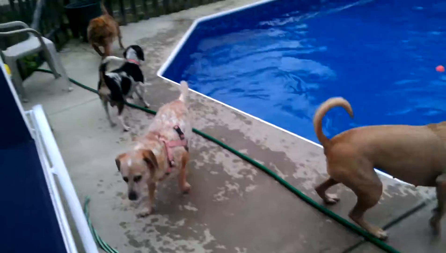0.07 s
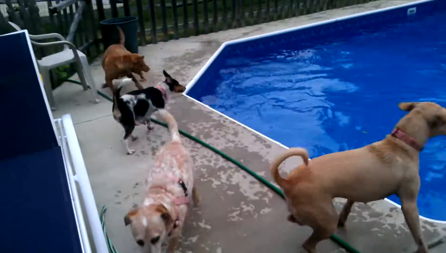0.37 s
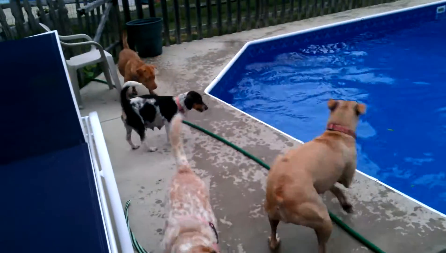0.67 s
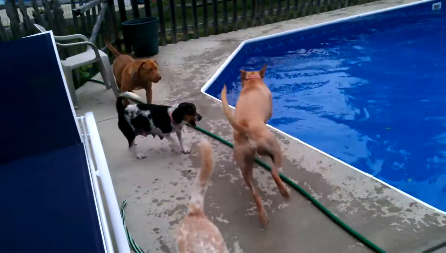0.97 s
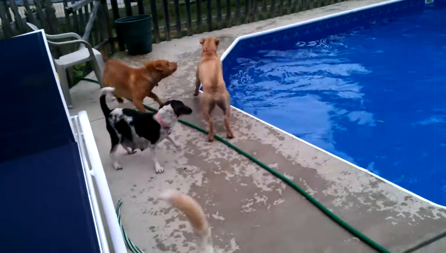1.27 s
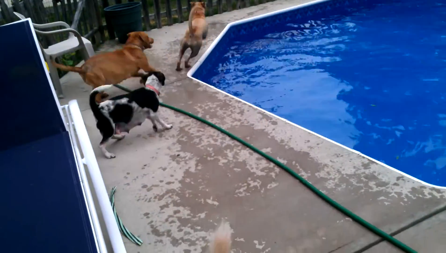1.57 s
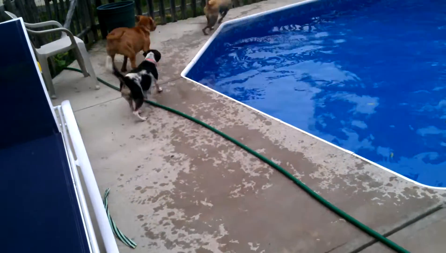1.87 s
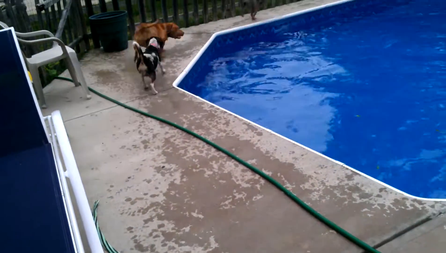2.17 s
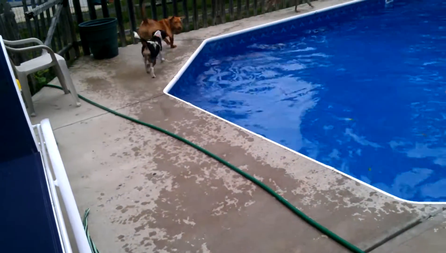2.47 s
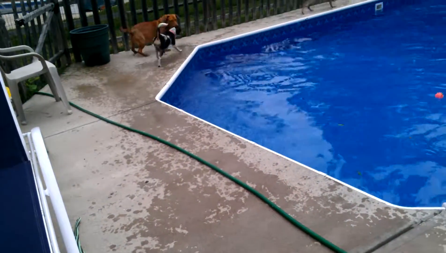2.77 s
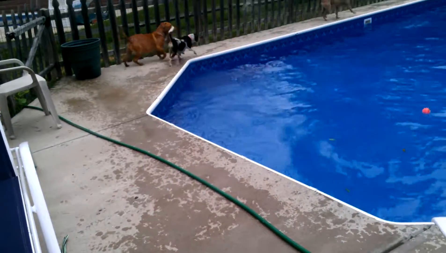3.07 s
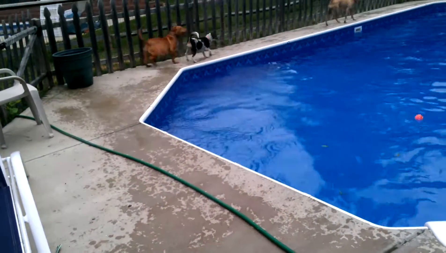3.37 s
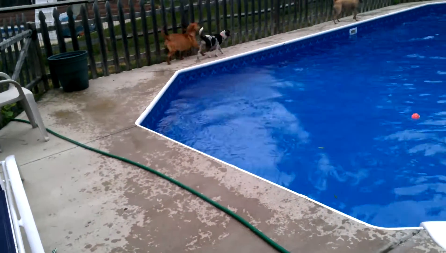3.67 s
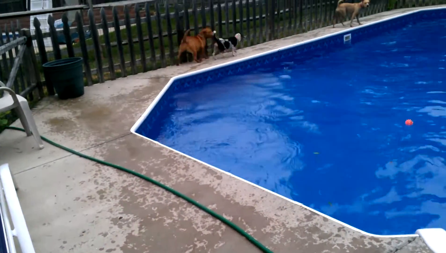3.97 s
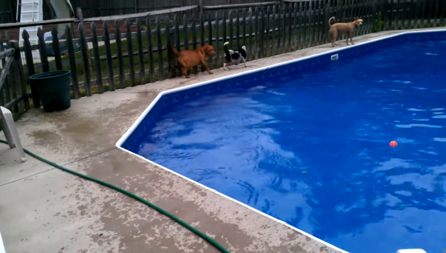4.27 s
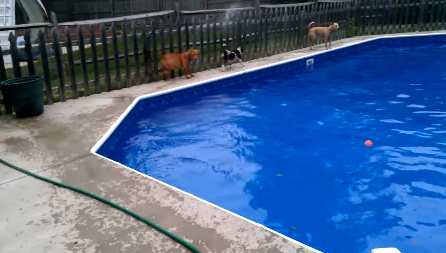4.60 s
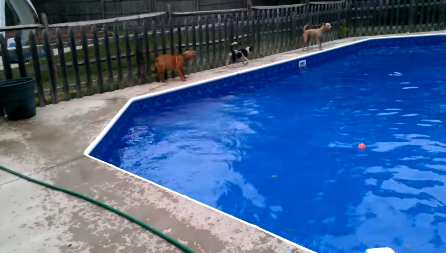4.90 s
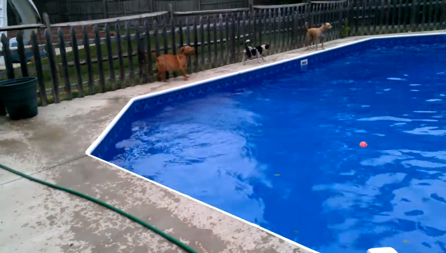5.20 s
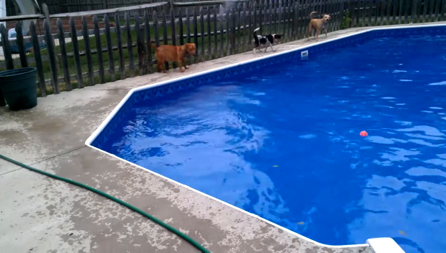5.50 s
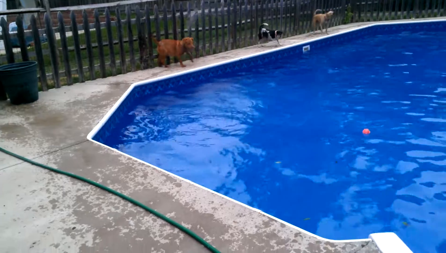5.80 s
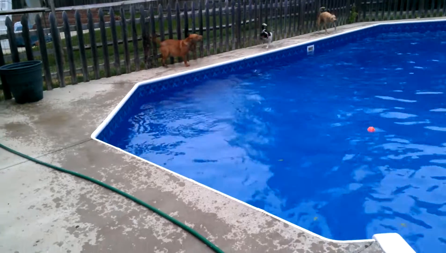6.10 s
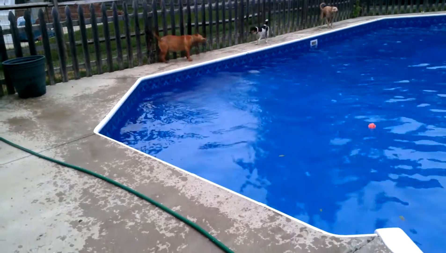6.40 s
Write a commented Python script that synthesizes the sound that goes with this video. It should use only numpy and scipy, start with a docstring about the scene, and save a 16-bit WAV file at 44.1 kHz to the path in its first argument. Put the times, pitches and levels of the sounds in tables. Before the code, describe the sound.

Dogs trot over concrete outdoors, their claws making sharp, irregular clicks and their collar tags clinking lightly. After about a second one gives a soft, low woof and a few short, hoarse grunts. Close by, a sleeve rustles and swishes against the hand-held microphone, and the grip creaks loudly at the start and again halfway through. A pool pump hums faintly underneath.

```python
"""Dogs on a pool deck.

Dogs trot off over concrete: claws click by impact and collar tags ring in their natural modes.
One gives a low woof and a few short grunts, pulsed airflow shaped by chest, throat and mouth.
Close by, friction makes a sleeve rustle and swish against a hand-held camera, and the grip twice
creaks by stick-slip on its hollow case. A pool pump hums under the faint outdoor air."""
import sys
import numpy as np
from scipy import signal
from scipy.fft import rfft, irfft, next_fast_len
from scipy.io import wavfile
from scipy.ndimage import uniform_filter1d, map_coordinates

SR = 44100
rng = np.random.default_rng(int(sys.argv[2]) if len(sys.argv) > 2 else 0)


def transcribe(u):
    """Save the signal u as a 16-bit wav file named by the first command-line argument.

    u: samples, shape (n,) or (channels, n), limited to [-1, 1]; the rate is SR.
    q: integer samples, one column per channel.
    """
    v = np.clip(np.atleast_2d(u).T, -1, 1)
    q = np.round(v * 32767).astype(np.int16)
    wavfile.write(sys.argv[1], SR, q)


N = 284445


def amp(db):
    """Decibels to amplitude ratio."""
    return 10 ** (np.asarray(db) / 20)


def unit(x):
    """Normalisation to rms 1."""
    return x / np.sqrt(np.mean(x ** 2) + 1e-20)


def along(points, hz):
    """Interpolation of (frequency_hz, value) points on a log frequency axis."""
    frequencies, values = np.transpose(points)
    return np.interp(np.log(hz + 1), np.log(frequencies + 1), values)


def curves(rows):
    """Linear interpolation in time: one curve for each column after the first."""
    times, *columns = np.transpose(rows)
    return [np.interp(np.arange(N) / SR, times, column) for column in columns]


def wobble(rate_hz):
    """Smooth random modulation: a spline through Gaussian knots."""
    knots = rng.standard_normal(int(N * rate_hz / SR) + 4)
    return map_coordinates(knots, [np.arange(N) * rate_hz / SR])


def filtered(x, response):
    """Linear filtering: the spectrum times a frequency response."""
    n = x.shape[-1]
    size = next_fast_len(n + 8192)
    return irfft(rfft(x, size) * response(np.fft.rfftfreq(size, 1 / SR)), size)[..., :n]


def coloured(x, spectrum):
    """Spectral shaping by (frequency_hz, gain_db) points, at rms 1."""
    return unit(filtered(x, lambda hz: amp(along(spectrum, hz))))


def pan(db):
    """Level difference, left over right, as two gains of mean 1."""
    gains = np.array([amp(np.atleast_1d(db) / 2), amp(-np.atleast_1d(db) / 2)])
    return gains / gains.mean(0)


def add(track, start_s, x):
    """Superposition of x on the track."""
    i = max(round(start_s * SR), 0)
    track[..., i:i + x.shape[-1]] += x[..., :N - i]


def swell(t, length_s, rise=0.33):
    """Critically damped pulse: it peaks at 1 after the share rise of its length."""
    u = t / (length_s * rise)
    return u * np.exp(1 - u)


def ring(modes, t, attack_s, vary_db):
    """Modal vibration: one blow excites damped sines of slightly random strength and pitch; peak 1."""
    x = sum(amp(db + vary_db * rng.normal() - 60 * t / t60)
            * np.sin(2 * np.pi * hz * rng.normal(1, 0.0057) * t) for hz, t60, db in modes)
    x *= 1 - np.exp(-t / attack_s)
    return x / np.abs(x).max()


# Likeness of left and right: frequency_hz, correlation
COHERENCE = [(100, 0.97), (600, 0.71), (1200, 0.057), (4000, 0.042), (12000, 0.046)]
def stereo_noise(patchy_db=0):
    """Partial coherence: noise alike on both sides in the bass only, with patches of random gain."""
    def mid_side(hz):
        angle = np.arccos(along(COHERENCE, hz)) / 2
        return np.array([np.cos(angle), np.sin(angle)])
    spectra = signal.stft(rng.standard_normal((2, N)), nperseg=512)[2]
    patches = uniform_filter1d(rng.standard_normal(spectra.shape[1:]), size=3, axis=0)
    patches = unit(uniform_filter1d(patches, size=7, axis=1))
    noise = signal.istft(spectra * amp(patchy_db * patches), nperseg=512)[1][:, :N]
    mid, side = filtered(noise, mid_side)
    return np.array([mid + side, mid - side])


# Shadow of the case: frequency_hz, left_over_right_db
CASE_SHADOW = [(1000, 3), (4000, 2.5), (5500, -19), (8000, -7), (12000, -16.5)]
def from_right(x):
    """Acoustic shadowing: the case shields its left port from the treble."""
    return filtered(x, lambda hz: pan(along(CASE_SHADOW, hz)))


# Outdoor air: frequency_hz, gain_db
AIR_SPECTRUM = [(100, -1), (240, -4), (330, -13.5), (500, -19.5), (820, -13.5), (1260, -25), (2500, -23),
                (4300, -19.5), (5200, -42), (6200, -48), (8200, -39.5), (14000, -59)]
def outdoor_air():
    """Ambient noise: a faint broad spectrum above 50 Hz."""
    air = coloured(stereo_noise(patchy_db=4), AIR_SPECTRUM)
    return amp(-56) * filtered(air, lambda hz: hz > 50)


# Tones of the pump: frequency_hz, level_db
PUMP_TONES = [(112.5, -63), (118.4, -70), (236.9, -63.5), (355.3, -67.5)]
def pool_pump():
    """Amplitude and phase modulation make the pump's hum slightly unsteady."""
    t = np.arange(N) / SR
    return sum(np.sqrt(2) * amp(db + 3.6 * wobble(6)) * np.sin(2 * np.pi * hz * t + 0.82 * wobble(3.98))
               for hz, db in PUMP_TONES)


# Rubbing of the resting sleeve: time_s, level_db
RESTING_CONTACT = [(0.1, -56.5), (0.5, -52.5), (0.6, -71.5), (0.83, -69), (0.9, -53.5), (1.44, -54),
                   (2.0, -52), (2.35, -48), (2.62, -62), (3.3, -62.5), (3.56, -69), (3.98, -55), (4.3, -64),
                   (4.83, -69), (5.1, -64), (5.58, -59.5), (5.78, -70.5), (6.45, -71)]
# Strokes of the arm: start_s, hold_s, hiss_db, rasp_db
ARM_STROKES = [(0.252, 0.085, -40.5, -47), (0.364, 0.028, -33.5, -38), (0.715, 0.051, -56, -57),
               (0.874, 0.019, -49.5, -61), (0.94, 0.032, -60, -48.5), (1.185, 0.17, -46.5, -46),
               (1.498, 0.035, -43, -46.5), (1.654, .03, -49, -55), (1.795, .13, -50.5, -50.5),
               (2.525, 0.037, -47, -67), (2.683, 0.18, -51, -51), (2.985, 0.14, -47, -54),
               (3.107, 0.076, -44.5, -51), (3.275, 0.017, -48, -52.5), (3.474, .02, -62.5, -57),
               (3.664, .1, -62, -55.5), (4.045, 0.16, -50.5, -54.5), (4.39, 0.13, -57.5, -52.5),
               (4.992, .08, -51.5, -56.5), (5.276, 0.14, -57, -54.5), (5.886, 0.1, -56.5, -51.5),
               (6.012, 0.069, -49, -46.5), (6.236, 0.019, -59, -57.5), (6.329, 0.097, -50, -51.5)]
def arm_levels(rise_db_per_s=547, fall_db_per_s=188):
    """Incoherent addition: strokes and resting contact sum in power, giving hiss and rasp in dB."""
    t = np.arange(N) / SR
    contact_db, = curves(RESTING_CONTACT)
    hiss, rasp = amp(contact_db) ** 2, amp(contact_db - 4) ** 2
    for start_s, hold_s, hiss_db, rasp_db in ARM_STROKES:
        shape_db = -rise_db_per_s * np.maximum(start_s - t, 0)
        shape_db -= fall_db_per_s * np.maximum(t - start_s - hold_s, 0)
        active = shape_db > -60
        hiss[active] += amp(hiss_db + shape_db[active]) ** 2
        rasp[active] += amp(rasp_db + shape_db[active]) ** 2
    return 10 * np.log10(hiss), 10 * np.log10(rasp)


# Bumps of the hand: start_s, level_db
HAND_BUMPS = [(0.26, -41), (1.328, -36.5), (2.331, -45), (2.698, -44), (3.121, -37.5), (3.649, -44.5),
              (4.038, -40), (4.101, -41), (4.39, -42), (4.463, -38.5), (4.744, -41.5), (4.911, -43.5),
              (5.166, -41), (5.37, -41.5), (5.539, -46.5), (5.661, -48.5), (5.915, -38.5), (5.985, -38.5),
              (6.088, -44), (6.36, -44)]
# Shaking of the case: frequency_hz, gain_db
RUMBLE_SPECTRUM = [(20, -29), (36, -16), (56, 6), (80, -1.5), (110, 1), (155, -9), (220, -9.5), (320, -13),
                   (450, -21.5), (800, -18.5), (1300, -23.5), (3000, -32.5)]
def hand_rumble(rubbing_db, bump_hz=110, lowest_hz=45):
    """Structure-borne sound: rubbing shakes the case; a bump swells the shaking and rings it low."""
    lumps, tones, t = np.zeros(N), np.zeros(N), np.arange(SR // 4) / SR
    for start_s, db in HAND_BUMPS:
        push = amp(db) * swell(t, length_s=0.058, rise=0.36)
        add(lumps, start_s, amp(-5) * push)
        add(tones, start_s, amp(-4) * push * np.sin(2 * np.pi * bump_hz * rng.normal(1, 0.053) * t))
    shake_db = -51 + 0.25 * (rubbing_db - rubbing_db.mean())
    noise = coloured(stereo_noise() * amp(4.6 * wobble(25)), RUMBLE_SPECTRUM)
    out = tones + np.hypot(amp(shake_db), lumps) * noise
    return filtered(out, lambda hz: 1 / (1 + (lowest_hz / (hz + 1)) ** 8)) * pan(-1.6)


# Bright hiss of cloth: frequency_hz, gain_db
HISS_SPECTRUM = [(500, -9.5), (1200, -18.5), (2200, -10.5), (3100, -9.5), (3900, -13), (4900, -8.5),
                 (6000, 1), (8200, 0.5), (10500, -1), (12000, -8.5), (14000, -7)]
# Lower rasp of cloth: frequency_hz, gain_db
RASP_SPECTRUM = [(600, -18), (1500, -26), (2200, -17.5), (3000, -8.5), (3700, -4.5), (4400, 2.5),
                 (5000, -8), (7000, -53), (12000, -30)]
def sleeve_rustle(hiss_db, rasp_db, snags_per_s=28, snag_decay_s=0.00096, snag_db=9):
    """Friction noise: fibres catch and slip in tiny grains, some snagging harder."""
    catches = rng.random(N) < snags_per_s / SR
    snags = signal.lfilter([1], [1, -np.exp(-1 / (snag_decay_s * SR))], catches)
    grain = amp(0.6 * wobble(900) + 1.15 * wobble(70) + snag_db * np.minimum(snags, 1))
    hiss = from_right(coloured(stereo_noise(patchy_db=4) * grain, HISS_SPECTRUM))
    rasp = coloured(stereo_noise(patchy_db=5) * grain, RASP_SPECTRUM) * pan(2.4)
    return amp(hiss_db + 5) * hiss + amp(rasp_db + 3) * rasp


# Slides of ribbed cloth: start_s, length_s, start_hz, end_hz, spread_hz, level_db
RIB_SLIDES = [(0.351, 0.042, 5750, 5470, 1860, -32.5), (1.111, 0.062, 6260, 5590, 497, -42),
              (1.49, .095, 4740, 4470, 1230, -38), (1.771, 0.12, 4560, 3840, 550, -44.5),
              (2.74, 0.054, 5860, 5600, 300, -44.5), (2.855, 0.057, 5580, 5300, 250, -49),
              (3.699, 0.056, 4680, 4350, 300, -43.5), (3.91, 0.02, 6200, 5700, 250, -46.5),
              (4.035, 0.091, 5270, 5700, 302, -42.5), (4.141, 0.031, 6800, 5760, 550, -35),
              (4.378, 0.027, 6270, 5900, 330, -38.5), (4.393, 0.095, 4780, 4010, 463, -45.5),
              (4.679, 0.029, 6030, 6140, 238, -41), (4.868, 0.082, 4470, 3400, 200, -60.5),
              (4.987, 0.044, 6550, 6330, 416, -41.5), (5.063, 0.098, 4190, 3610, 396, -45.5),
              (5.199, 0.063, 5600, 5600, 175, -54.5), (5.285, 0.046, 5930, 5500, 380, -37.5),
              (5.316, 0.12, 4320, 3970, 470, -42.5), (5.973, 0.094, 4590, 3950, 510, -38.5)]
def sleeve_swishes(flutter_db=2):
    """Periodic friction: ribs skip over ribs in a fuzzy whistle that sinks when the slide slows."""
    out, t = np.zeros((2, N)), np.arange(SR // 4) / SR
    for start_s, length_s, start_hz, end_hz, spread_hz, db in RIB_SLIDES:
        hz = start_hz * (end_hz / start_hz) ** np.minimum(t / length_s, 1)
        fuzz = rng.standard_normal((2, len(t), 2)) @ [1, 1j]
        fuzz = signal.sosfilt(signal.butter(3, spread_hz, fs=SR, output="sos"), fuzz)
        whistle = unit((fuzz * np.exp(2j * np.pi * np.cumsum(hz) / SR)).real)
        add(out, start_s, amp(db) * whistle * swell(t, length_s))
    return from_right(out * unit(amp(flutter_db * wobble(200))))


# Ticks of the case: start_s, peak_db
CASE_TICKS = [(0.4253, -39), (0.553, -36.5), (3.1915, -25), (3.2228, -17.5)]
# Modes of a tick: frequency_hz, t60_s, level_db
DEAD_MODES = [(750, .009, -2), (1400, 0.0083, 3), (2150, .01, 7), (3000, 0.0073, -20)]
def case_ticks():
    """Heavy damping: the stiff case gives way with a dead, broad tick."""
    out, t = np.zeros(N), np.arange(SR // 20) / SR
    for start_s, db in CASE_TICKS:
        add(out, start_s, amp(db) * ring(DEAD_MODES, t, attack_s=0.0001, vary_db=1))
    return out


# Creaks of the grip: start_s, length_s, level_db, thud_db, snap_db
GRIP_CREAKS = [(0.245, .155, -29.5, -6.5, -24), (3.107, .1, -28.5, -4, 2.5)]
def slips(gap_s=0.012, scatter=0.33, vary_db=1.7):
    """Stick-slip motion: each creak is an uneven run of slips, listed like the jolts below."""
    rows = []
    for start_s, length_s, db, thud_db, snap_db in GRIP_CREAKS:
        for k, (offset, strength) in enumerate(rng.standard_normal((40, 2))):
            if k * gap_s < length_s:
                slip_s = start_s + gap_s * (k + scatter * offset)
                rows.append((slip_s, db + vary_db * strength, thud_db, snap_db))
    return rows


# Jolts, where the grip gives way at once: start_s, level_db, thud_db, snap_db
GRIP_JOLTS = [(0.27, -31.5, 6, -18), (0.3236, -13.5, -11.5, -37), (3.1175, -19, -20, -6),
              (3.161, -24.5, -25, -5)]
# Modes of the hollow case, its low thud and its wall: frequency_hz, t60_s, level_db
CASE_MODES = [(580, 0.035, -19), (638, 0.056, -4), (725, 0.068, -4.5), (810.4, 0.091, 1.5), (867, 0.043, 2),
              (940, 0.042, -7)]
THUD_MODES = [(109, 0.039, -25), (246, 0.092, -2), (309, 0.048, 3.5), (358, 0.022, 12.5), (450, 0.015, 0)]
WALL_MODES = [(1300, .015, -4), (1510, .02, -6), (1760, 0.018, -1), (2140, 0.031, 14.5), (2360, 0.024, 8),
              (2590, 0.099, 1.5)]
# Friction on the wall: frequency_hz, gain_db
GRATE_SPECTRUM = [(1000, -30), (1500, -4), (1950, 10), (2700, 1), (3000, -35), (5000, -42)]
def grip_creaks(damped_above_hz=1020, grate_t60_s=0.047, chatter_t60_s=0.1):
    """Impulse excitation: each slip of the hand knocks the case, grates and chatters on briefly."""
    out, t = np.zeros(N), np.arange(SR // 6) / SR
    damping = signal.butter(6, damped_above_hz, fs=SR, output="sos")
    for start_s, db, thud_db, snap_db in GRIP_JOLTS + slips():
        case, thud, snap = (ring(modes, t, attack_s=0.0015, vary_db=2)
                            for modes in (CASE_MODES, THUD_MODES, WALL_MODES))
        knock = signal.sosfilt(damping, case) + amp(thud_db - 3) * thud + amp(snap_db - 2) * snap
        chatter = 0.014 * rng.standard_normal(len(t)) * amp(-60 * t / chatter_t60_s)
        grate = coloured(rng.standard_normal(len(t)), GRATE_SPECTRUM)
        grate *= amp(snap_db - 6 - 60 * t / grate_t60_s)
        add(out, start_s, amp(db) * (knock + grate + signal.fftconvolve(knock, chatter)[:len(t)]))
    return out


def right_first(x, lag_s=0.00026):
    """Arrival-time difference: sound from the right reaches the left port later."""
    return filtered(x, lambda hz: np.exp(1j * np.pi * hz * lag_s * np.array([[-1], [1]])))


# Decay of the yard: frequency_hz, t60_s
YARD_DECAY = [(200, 0.04), (1000, 0.25), (10000, 0.14)]
def yard_reverb(x):
    """Reverberation: fence and house wall answer briefly, the midrange lasting longest."""
    hz, t, spectra = signal.stft(rng.standard_normal((2, SR // 3)), SR, nperseg=256)
    decay = amp(-60 * t / along(YARD_DECAY, hz)[:, None])
    tail = signal.istft(spectra * decay, SR, nperseg=256)[1]
    return signal.fftconvolve(x[None], tail / np.linalg.norm(tail[0]), axes=1)[:, :N]


# Tags touching: start_s, level_db
TAG_STRIKES = [(0.627, -46), (0.689, -44.5), (0.73, -38.5), (0.766, -41), (0.778, -37.5), (1.129, -36),
               (1.291, -34), (1.557, -28), (3.886, -37.5), (3.913, -40), (3.948, -36), (4.016, -36.5),
               (4.043, -42), (5.125, -43), (5.397, -36)]
# Modes of a tag: frequency_hz, t60_s, level_db
TAG_MODES = [(4550, .07, -11), (5570, 0.11, -5.5), (5830, 0.043, 4), (8120, 0.13, 6.5), (8100, .05, -4),
             (10260, 0.072, 4), (13000, .04, -13)]
def collar_tags(flutter_db=2.9):
    """Free vibration of plates: metal tags collide and ring in inharmonic modes."""
    out, t = np.zeros((2, N)), np.arange(SR // 6) / SR
    for start_s, db in TAG_STRIKES:
        clink = np.array([ring(TAG_MODES, t, attack_s=0.00084, vary_db=7) for side in range(2)])
        add(out, start_s, amp(db) * clink)
    return from_right(out * unit(amp(flutter_db * wobble(300))))


# Claws on concrete: start_s, level_db, body_db, body_left_over_right_db, t60_s
CLAW_STRIKES = [(0.133, -30, 0.5, 3.5, 0.039), (0.233, -21.5, -25, 11, 0.045),
                (0.4347, -27.5, -7, 27, 0.096), (0.852, -27.5, -21, -3, 0.08),
                (0.8834, -28, -10.5, 1, 0.038), (0.9367, -30.5, 3, -3.5, 0.19),
                (1.0388, -24, -0.5, -2.5, 0.052), (1.331, -20, -7.5, 3, .05), (1.493, -24, -22, 9, 0.022),
                (1.6804, -29.5, -20, -5, .051), (2.2118, -19.5, -9.5, -2.5, 0.043),
                (2.39, -25, -5.5, 6, .077), (2.408, -21, -13, 15, 0.037), (2.8596, -35.5, -7, -3, .085),
                (2.9624, -29.5, -8, 7, .063), (3.091, -22.5, -3.5, 0, 0.041), (3.116, -22, 0, 9, 0.029),
                (3.267, -32, -1.5, 2, 0.086), (4.1454, -29.5, -11, 0, .049),
                (4.189, -31.5, -14.5, -2, 0.086), (4.4889, -24, -3, 1, 0.053), (5.623, -32.5, -1, 0, 0.13),
                (5.9055, -38.5, -7, 5, .065), (6.34, -31.5, -2.5, 4, 0.12), (6.373, -30.5, -14, 7, 0.068),
                (6.409, -32.5, -3.5, 5, 0.045)]
# Bright edge and duller body of a click: frequency_hz, gain_db
EDGE_SPECTRUM = [(2000, -22), (4500, 2), (6200, 10), (8200, 8.5), (10500, -1), (14000, -3.5)]
BODY_SPECTRUM = [(200, -10.5), (800, -5), (1300, -7.5), (1800, -1.5), (2300, 1), (3100, -4), (4100, 3.5),
                 (5200, -7), (9000, -50)]
def claw_clicks(attack_s=0.0025, strike_s=0.002, rebound_s=0.0055, spike_t60_s=0.0067, tail_t60_s=0.55):
    """Impact and rebound: a claw strikes and bounces once within a gritty scrape with a weak tail."""
    edge, body, t = np.zeros(N), np.zeros((2, N)), np.arange(SR // 3) / SR
    spike = amp(0.5 - 60 * t / spike_t60_s) * (1 - np.exp(-t / 0.00043))
    tail = amp(-20 - 60 * t / tail_t60_s)
    for start_s, db, body_db, side_db, t60_s in CLAW_STRIKES:
        scrape = (1 - np.exp(-t / attack_s)) * (amp(-60 * t / t60_s) + tail)
        edge_gain = amp(db - 4.5)
        add(edge, start_s, edge_gain * scrape)
        add(edge, start_s + strike_s, edge_gain * spike)
        add(edge, start_s + strike_s + rebound_s * rng.uniform(0.41, 1), edge_gain * spike / 2)
        add(body, start_s, amp(db + body_db - 5) * scrape * pan(side_db))
    grit = amp(2 * wobble(900))
    edge_noise = from_right(coloured(stereo_noise(patchy_db=0.5) * grit, EDGE_SPECTRUM))
    body_noise = coloured(stereo_noise(patchy_db=1.5) * grit, BODY_SPECTRUM)
    return edge * edge_noise + body * body_noise


def vocal_folds(pitch_hz, jitter, breath_share):
    """Glottal source: uneven pulses mixed with air that escapes once a cycle."""
    cycles = np.cumsum(pitch_hz * np.exp(jitter * wobble(120))) / SR
    pulses = unit(np.diff(np.floor(cycles), prepend=0) * amp(1.7 * wobble(150)))
    breath = unit(rng.standard_normal(N) * np.exp(-3 * (cycles % 1)))
    return np.sqrt(1 - breath_share) * pulses + np.sqrt(breath_share) * breath


# Grunts: start_s, length_s, pitch_hz, mouth_hz, level_db
DOG_GRUNTS = [(1.433, 0.022, 143.5, 696, -48.5), (1.663, 0.022, 155.3, 930, -36),
              (1.679, 0.022, 141, 920, -46), (1.685, 0.025, 156, 766, -38.5),
              (1.759, 0.022, 171.6, 1080, -36.5), (1.778, 0.039, 157, 1000, -39),
              (1.84, 0.018, 151, 930, -41.5), (2.129, 0.011, 156, 930, -49)]
# Response of the throat: frequency_hz, gain_db
THROAT = [(150, -1), (330, 12), (520, 12.5), (1150, -8), (1550, -5), (2200, 6.5), (3000, -10),
          (8000, -39)]
def grunts(width_hz=260, throat_db=-6):
    """Source and filter: hoarse bursts excite one mouth resonance over a weaker throat sound."""
    out, t = np.zeros(N), np.arange(SR // 5) / SR
    for start_s, length_s, pitch_hz, mouth_hz, db in DOG_GRUNTS:
        source = vocal_folds(pitch_hz, jitter=0.1, breath_share=1)[:len(t)]
        formant = lambda hz: (1j * hz * width_hz / (mouth_hz ** 2 - hz ** 2 + 1j * hz * width_hz)) ** 2
        voice = unit(filtered(source, formant)) + amp(throat_db) * coloured(source, THROAT)
        push = swell(t, length_s)
        add(out, start_s, amp(db) * unit(voice * push) * np.sqrt(np.mean(push ** 2)))
    return out


# Course of the woof: time_s, pitch_hz, level_db
WOOF_CONTOUR = [(1.27, 135.1, -54), (1.328, 140.2, -45.5), (1.345, 167.6, -32.5), (1.364, 135.3, -47),
                (1.384, 124.2, -40), (1.406, 131.2, -40.5), (1.426, 111.4, -52), (1.471, 106.4, -53)]
# Response of the chest: frequency_hz, gain_db
CHEST_SPECTRUM = [(80, -13), (130, -6), (250, 8), (335, 7), (400, -10), (500, -17), (800, -24), (1300, -52),
                  (3000, -72)]
def woof():
    """Low resonance: the chest colours a closed-mouthed woof whose pitch jumps up and sinks."""
    t = np.arange(N) / SR
    pitch_hz, level_db = curves(WOOF_CONTOUR)
    sounding = (t >= WOOF_CONTOUR[0][0]) & (t <= WOOF_CONTOUR[-1][0])
    source = vocal_folds(pitch_hz, jitter=0.0423, breath_share=0.24)
    return sounding * amp(level_db) * coloured(source, CHEST_SPECTRUM)


def scene():
    """Superposition of the background, the near handling sounds and the dogs."""
    voice = grunts() + woof()
    hiss_db, rasp_db = arm_levels()
    handling = sleeve_rustle(hiss_db, rasp_db) + sleeve_swishes() + hand_rumble(rasp_db)
    dogs = voice + amp(-4.5) * yard_reverb(voice) + collar_tags() + claw_clicks()
    background = pool_pump() + outdoor_air()
    grip = right_first(grip_creaks() + case_ticks())
    return background + handling + grip + dogs


def record(dry, start_s=0.1, fade_s=0.005, top_hz=14300):
    """Gating and band limiting: the sound opens after a moment and loses its highest treble."""
    gate = np.clip((np.arange(N) / SR - start_s) / fade_s, 0, 1)
    return filtered(dry * gate, lambda hz: hz < top_hz)


dry = scene()
out = record(dry)
transcribe(out)
```